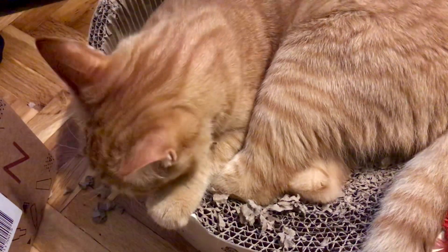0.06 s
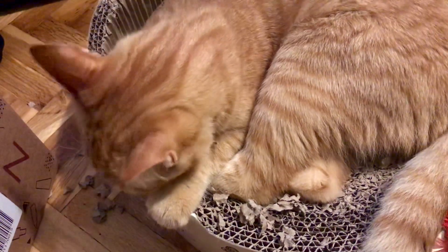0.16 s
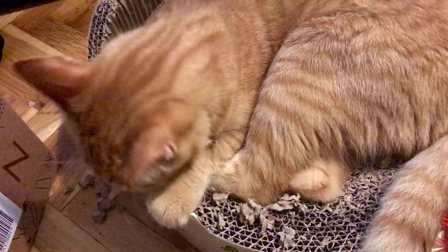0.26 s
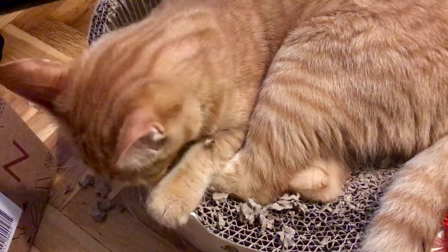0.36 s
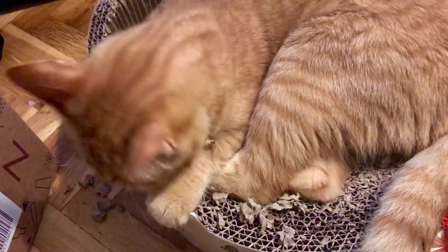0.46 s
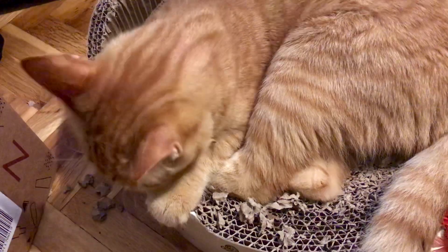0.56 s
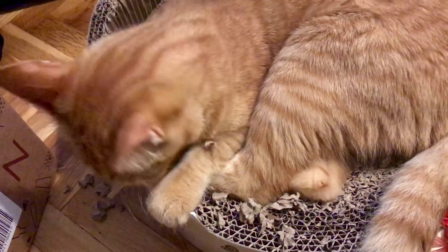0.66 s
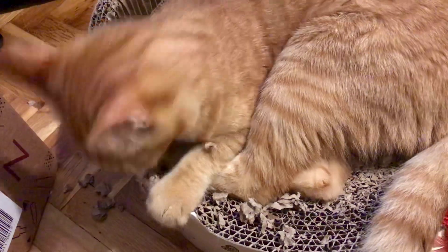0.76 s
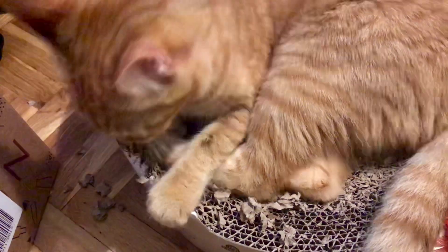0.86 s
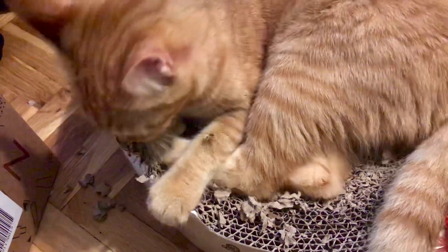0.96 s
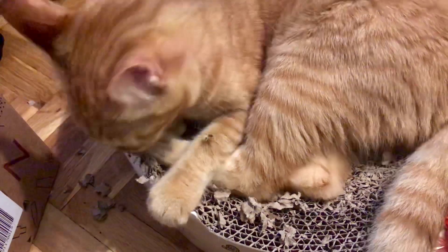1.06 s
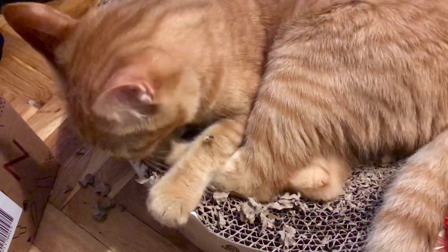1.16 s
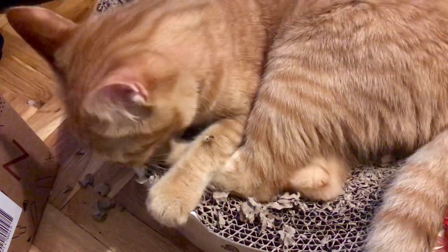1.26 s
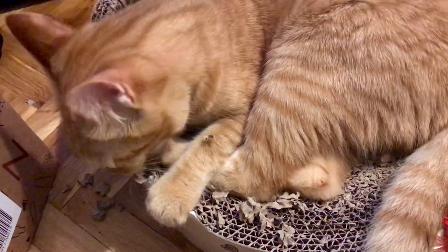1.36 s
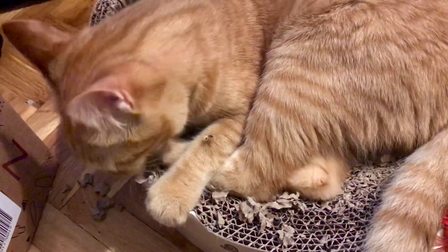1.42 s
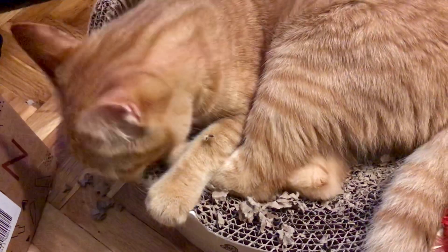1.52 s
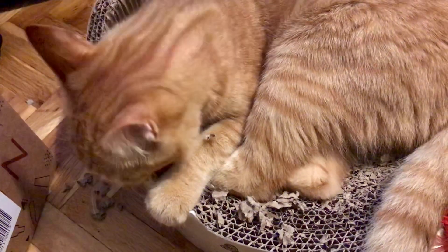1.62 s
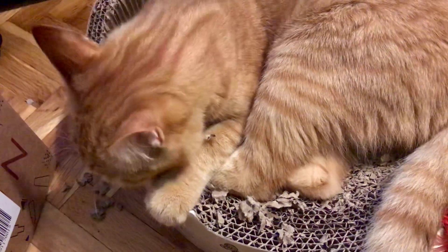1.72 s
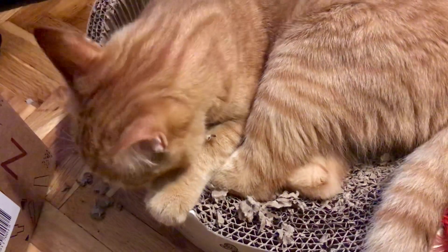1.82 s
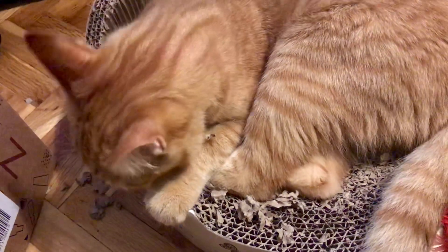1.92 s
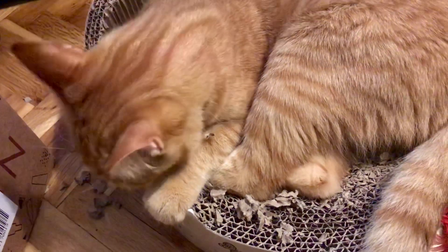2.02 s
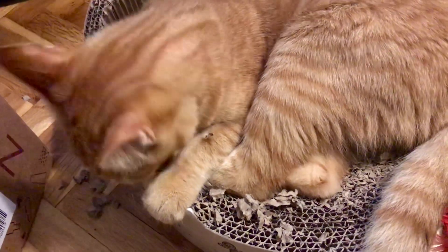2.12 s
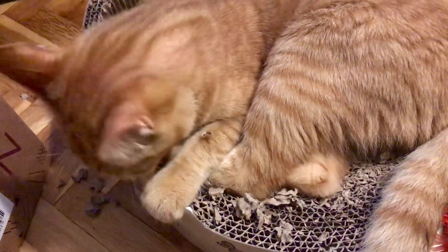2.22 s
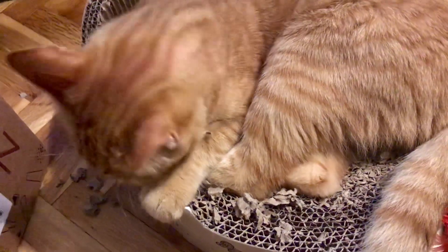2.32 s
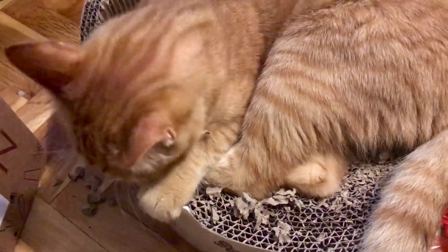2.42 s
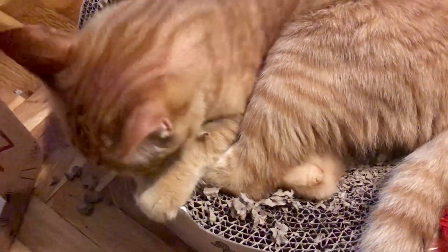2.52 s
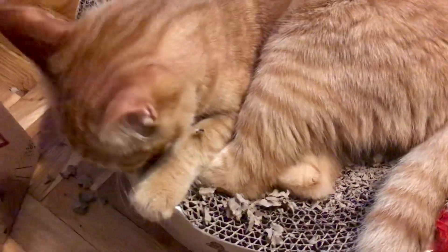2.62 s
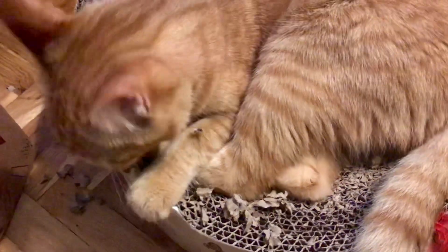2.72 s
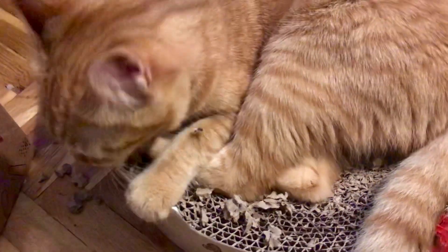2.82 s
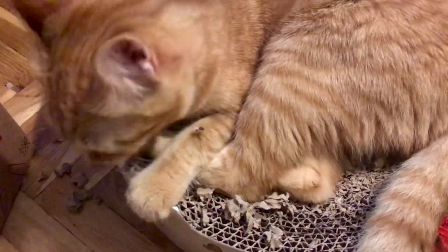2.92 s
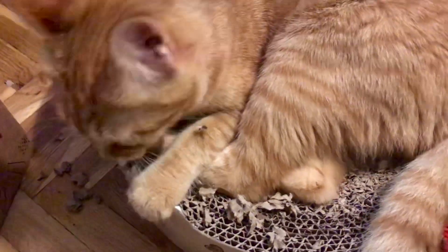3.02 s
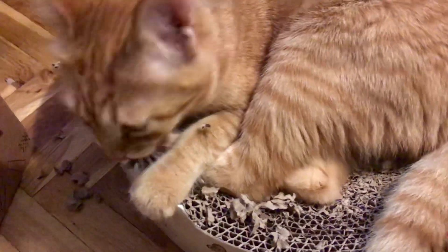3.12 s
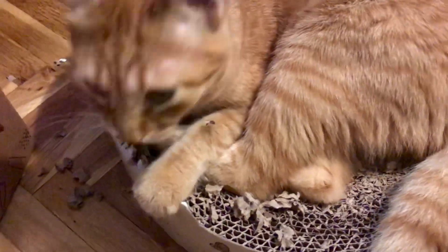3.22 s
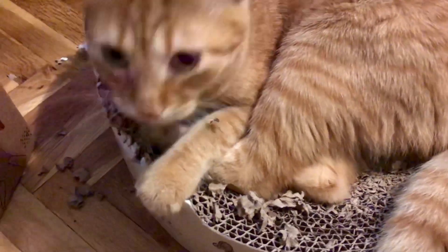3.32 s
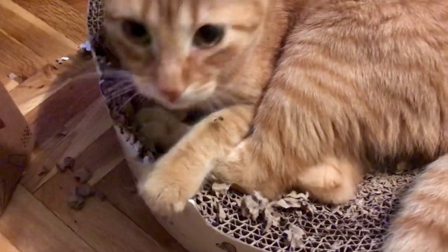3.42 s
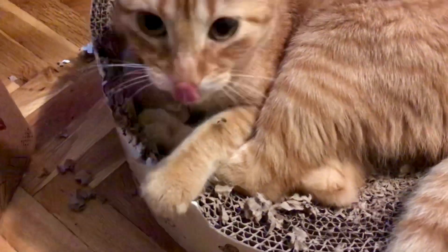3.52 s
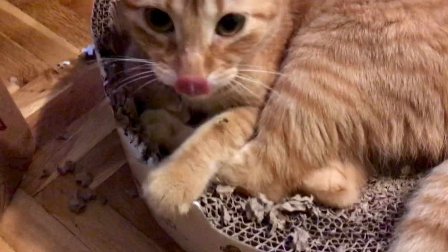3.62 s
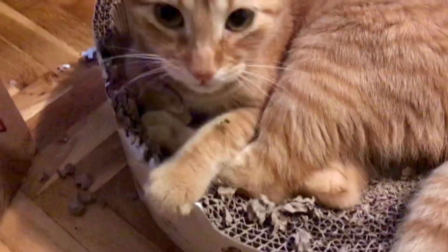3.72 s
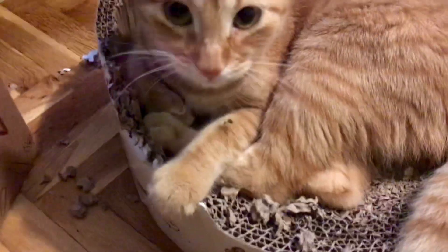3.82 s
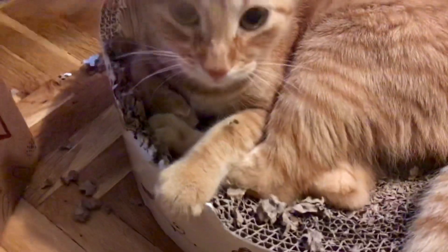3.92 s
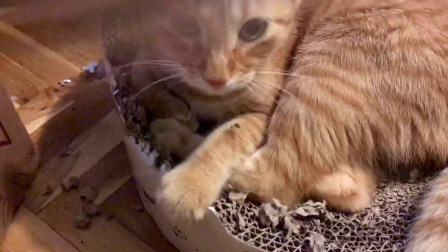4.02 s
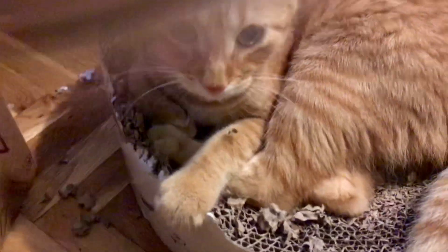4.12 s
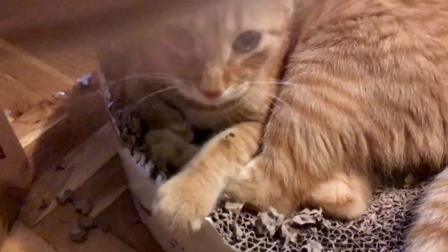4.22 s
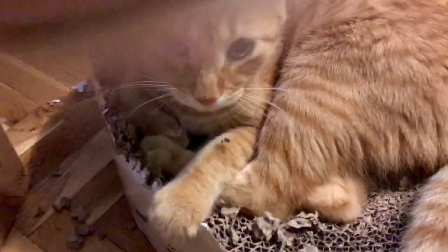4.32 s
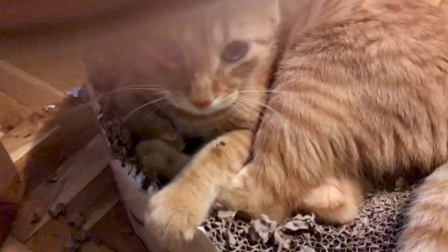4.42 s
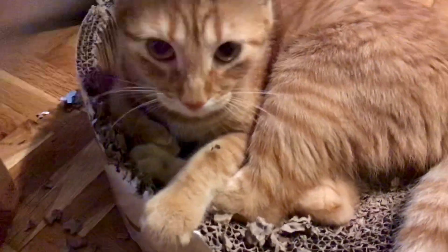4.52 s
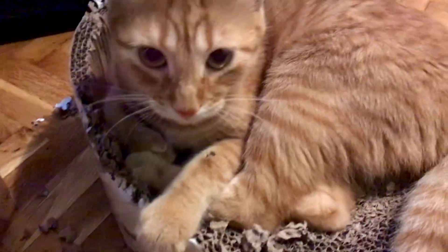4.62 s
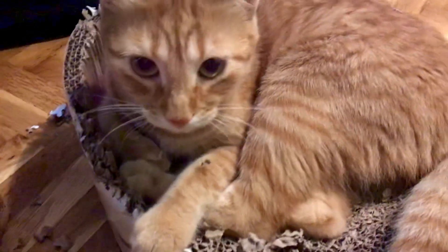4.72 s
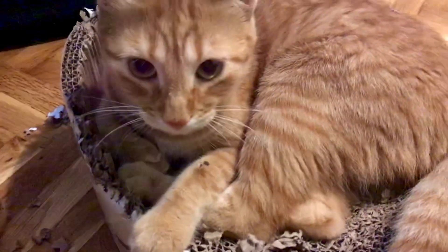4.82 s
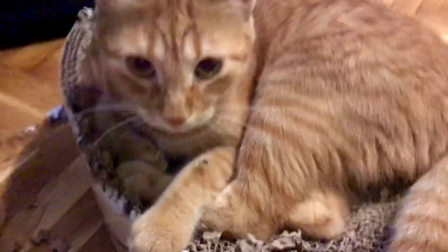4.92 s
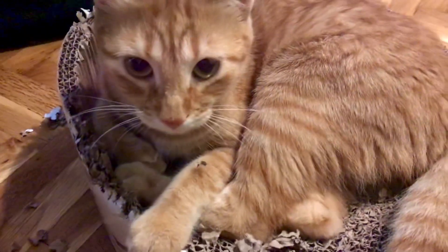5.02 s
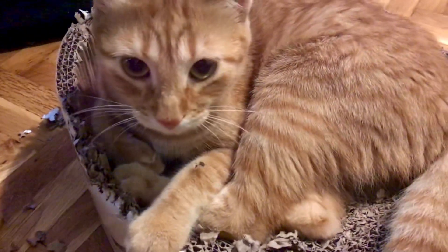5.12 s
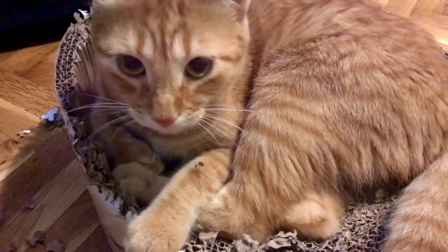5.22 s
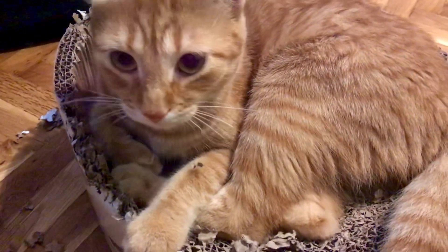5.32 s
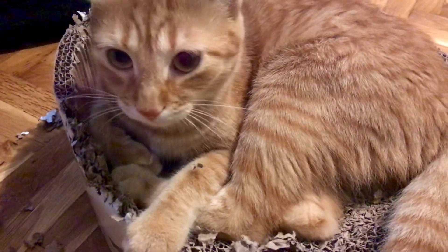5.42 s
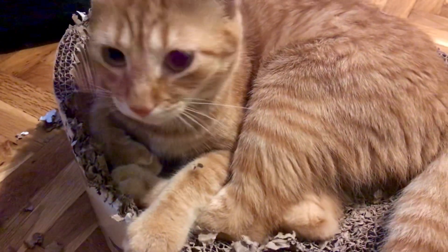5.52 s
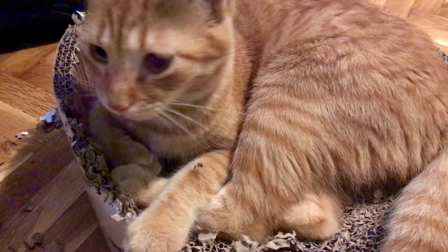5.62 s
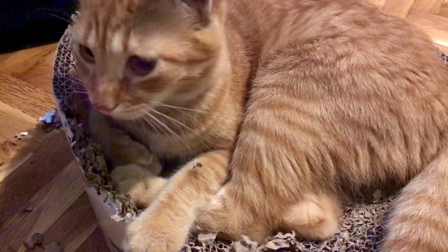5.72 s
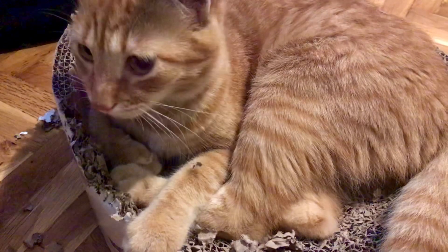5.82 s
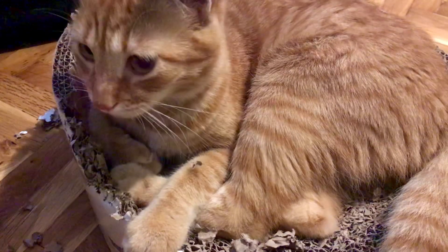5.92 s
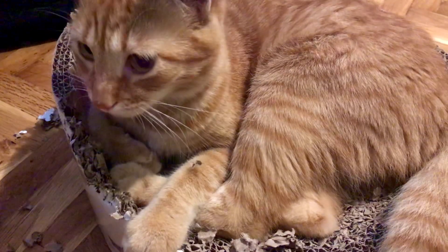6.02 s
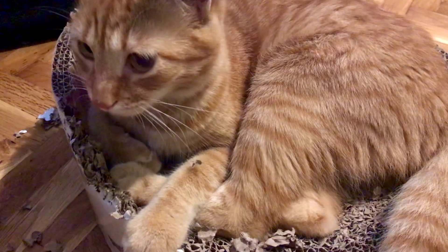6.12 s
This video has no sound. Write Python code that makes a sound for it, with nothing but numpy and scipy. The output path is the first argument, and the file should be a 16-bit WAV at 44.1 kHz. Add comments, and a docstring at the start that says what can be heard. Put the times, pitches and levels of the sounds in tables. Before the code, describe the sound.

Close up in a quiet room, a cat rips and crunches corrugated cardboard in short bursts, then pauses; a few light knocks and a soft bump follow.

```python
"""Over a low hum and a faint electronic whine, fur and teeth rub on cardboard and a rip follows at once.
A cat bites and tears a corrugated cardboard bed, close by in a quiet room: each pull breaks a run of
paper fibres, stiff flutes snap, and the hollow board resonates under both. Soft bumps and, later,
light taps are heard. Random impulses excite the modes of paper, board, floor and a small object;
sines make the hum and whine, filtered noise the room air."""
import sys
import numpy as np
from scipy import signal
from scipy.fft import rfft, irfft, next_fast_len
from scipy.io import wavfile
from scipy.ndimage import map_coordinates

SR = 44100
rng = np.random.default_rng(int(sys.argv[2]) if len(sys.argv) > 2 else 0)


def transcribe(signal):
    """Save signal, clipped to [-1, 1], as a 16-bit WAV file at the path in sys.argv[1]."""
    frames = np.atleast_2d(signal).T
    limited = np.clip(frames, -1, 1)
    pcm = np.round(limited * 32767).astype(np.int16)
    wavfile.write(sys.argv[1], SR, pcm)


N = 271656
T = np.arange(N) / SR
BLOW = T[:SR // 4]  # time axis of one short event, s

# Low room hum. Each row: time in seconds, fundamental in Hz, mean level in dB.
HUM_COURSE = [(0, 59.66, -63), (2.5, 61.16, -66), (4.2, 59, -69.5), (4.699, 53.95, -63.5),
              (5.398, 54.46, -66), (6.16, 51.3, -68.5)]
# Spectrum of the room air. Each row: frequency in Hz, relative gain in dB.
AIR_SPECTRUM = [(12, -40.5), (22, -34.5), (36, -15), (62, -7.5), (90, -11), (120, -12), (170, -15),
                (220, -18), (390, -24.5), (1000, -30), (4000, -37.5), (16000, -43.5)]
# Strokes of fur and teeth on the paper. Each row: start in seconds, length in seconds,
# level in dB before its flutter, scrape pitch in Hz.
RUB_STROKES = [(.01, .11, -61.5, 4170), (0.208, 0.083, -60.5, 2700), (.44, 0.086, -68, 3300),
               (0.605, 0.13, -62.5, 3000), (0.839, 0.035, -61, 2150), (0.934, 0.071, -63.5, 4730),
               (1.075, 0.18, -72, 4140), (1.332, 0.061, -68, 4200), (1.451, 0.096, -66.5, 4100),
               (1.574, 0.055, -67, 2800), (1.779, .44, -66, 3300), (2.327, 0.017, -65.5, 4100),
               (2.541, 0.17, -73, 2660), (2.76, 0.056, -69.5, 3500), (3.168, 0.41, -78, 3420),
               (3.66, 0.068, -69.5, 3450)]
# Spectrum of the rubbed grains. Each row: frequency in Hz, relative gain in dB.
FUR_SPECTRUM = [(350, -31.5), (600, 3.5), (900, -1.5), (1400, 1), (2200, -1.5), (4100, -3.5), (7600, -6),
                (10500, -9.5), (16000, -9.5)]
# Pulls that tear the paper. Each row: time of the height in seconds, rise in seconds per 20 dB,
# fall in seconds per 20 dB, rip level in dB, flap ring in Hz, board level in dB over the rip.
TEAR_PULLS = [(0.042, 0.031, 0.041, -44.5, 5960, -10), (.133, .015, 0.069, -40.5, 4200, -3),
              (.158, 0.032, 0.049, -40, 3000, 0), (.193, 0.016, 0.013, -39, 3580, 2.5),
              (0.297, 0.07, 0.036, -47.5, 3150, -10.5), (.335, 0.069, 0.075, -50, 2400, -7.5),
              (.495, 0.074, .06, -56, 3970, -6), (.799, .013, 0.02, -33.5, 6800, -4),
              (.811, 0.018, 0.021, -32.5, 3400, -2.5), (1.826, 0.025, 0.031, -49, 3100, 1.5),
              (1.881, .02, 0.015, -49.5, 5960, -2.5), (1.904, 0.0088, 0.01, -48.5, 3000, -3),
              (1.924, 0.011, 0.029, -41, 2900, -0.5), (2.04, 0.036, 0.014, -49, 4400, -6),
              (2.083, .025, 0.022, -40, 4570, -3), (2.138, 0.02, 0.1, -55, 4020, -5),
              (2.335, 0.04, 0.077, -55, 4050, -1), (2.492, 0.047, 0.048, -43, 3680, -0.5),
              (2.885, 0.016, 0.034, -53.5, 2940, -8)]
# Spectrum of breaking paper fibres. Each row: frequency in Hz, gain in dB.
FIBRE_SPECTRUM = [(150, -25), (700, -17), (1700, -4), (3200, 0.5), (4400, 1), (4950, -7), (7100, -6.5),
                  (8000, -8.5), (12000, -11.5), (16000, -16)]
# Mean modes of the stiff paper flutes. Each row: frequency in Hz, width in Hz, level in dB.
FLUTE_MODES = [(2570, 130, 2), (3000, 120, -8), (3370, 80, -22), (3960, 90, -16), (4100, 560, -22),
               (4280, 90, -17), (5330, 88, -13), (6640, 310, -4), (6930, 180, -17.5), (8600, 67, -13),
               (12000, 450, -13)]
# Modes of the hollow board. Each row: frequency in Hz, width in Hz, relative level in dB.
BOARD_MODES = [(165.3, 63, 2.5), (357.3, 42, 3), (499, 66, 0), (613, 89, -1), (740, 97, -1.5),
               (1054, 77, -1), (1424, 89, 1.5), (1647, 120, -6.5), (1935, 160, -6.5)]
# Flutes that snap. Each row: time in seconds, crack level in dB, ring in Hz,
# splinter time in seconds per 20 dB, board level in dB over the crack.
FLUTE_SNAPS = [(0.0412, -43, 6550, 0.004, -21), (0.169, -36, 4630, 0.0012, -11),
               (0.1933, -25.5, 5200, 0.00096, -19), (.28, -49.5, 5500, .0023, 0),
               (0.2966, -45.5, 4600, 0.0026, -12), (.304, -47, 5500, .002, -5.5),
               (.368, -51.5, 4950, .003, -7), (0.3758, -50.5, 4520, .002, -9),
               (.516, -51, 4540, 0.0035, -9), (0.6756, -51.5, 6640, 0.0066, -5.5),
               (.765, -53.5, 5240, 0.011, -4), (.852, -44, 5260, 0.0034, -7), (1.369, -58, 3500, .008, -9),
               (1.753, -59, 3900, 0.0043, 2.5), (1.782, -44.5, 10300, 0.0061, -3.5),
               (1.809, -56, 9500, .005, -13), (1.8282, -33, 3000, 0.0077, -4),
               (1.9214, -28, 3000, 0.019, -5.5), (1.939, -38, 3500, 0.003, -6),
               (2.0308, -50, 4220, .005, -13), (2.0829, -33.5, 4370, 0.0064, -3.5),
               (2.167, -39.5, 5600, 0.023, -16), (2.176, -42, 2260, 0.0092, -1.5),
               (2.3236, -50, 4250, .0045, -5), (2.3488, -37.5, 4100, 0.0036, -7),
               (2.3788, -49, 3930, 0.004, 1), (2.445, -55, 4200, .012, -2),
               (2.463, -49.5, 4200, 0.0065, -6), (2.809, -58, 6300, .004, -9),
               (2.823, -62, 6400, .004, -13)]
# Soft bumps through the floor. Each row: time in seconds, thud level in dB.
FLOOR_BUMPS = [(1.696, -53), (2.67, -53), (2.876, -52), (4.9384, -40.5)]
# Spectrum of a dull thud. Each row: frequency in Hz, relative gain in dB.
THUD_SPECTRUM = [(25, -18), (62, -43), (90, -1.5), (165, 2), (260, -1), (400, -9), (1000, -25), (4000, -72)]
# Light taps and knocks. Each row: time in seconds, level in dB, ring in Hz,
# rattle time in seconds per 20 dB, low thud level in dB.
LIGHT_TAPS = [(3.051, -57, 710, 0.0085, -54.5), (3.331, -66, 1090, 0.0046, -62),
              (3.449, -63, 4500, 0.0024, -77), (3.545, -60, 2180, 0.0018, -68),
              (4.3855, -37, 2450, 0.0094, -63), (4.3894, -46, 1480, 0.032, -51.5),
              (4.476, -51, 2380, 0.01, -78), (4.515, -56.5, 1440, .0047, -54),
              (4.558, -54, 5750, 0.0018, -51.5), (4.569, -62, 600, 0.0068, -57),
              (6.141, -57.5, 650, 0.025, -65)]
# Modes of the tapped object. Each row: frequency in Hz, width in Hz, level in dB.
KNOCK_MODES = [(424, 73, 5), (620, 100, 6), (910, 140, 3.5), (1280, 530, -2.5), (1580, 140, 3.5),
               (1890, 170, -3.5), (2410, 140, -2), (2820, 140, 0), (3500, 1800, -7), (4500, 350, -6.5),
               (5640, 390, -16)]
# Decay of the room. Each row: frequency in Hz, reverberation time (60 dB) in seconds.
ROOM_DECAY = [(150, 0.41), (1000, 0.32), (4000, 0.19), (14000, 0.15)]

# Whine: pitch, rms level of each harmonic before the fade, and where the fade begins
WHINE_HZ, WHINE_DB, WHINE_KNEE_HZ = 1004, -87, 5500
STROKE_RISE_S, STROKE_FALL_S = 0.063, 0.13  # each spans 20 dB
CATCH_PER_S, CATCH_DB = 170, -6  # tougher fibres that break singly during a pull
BOARD_HZ, BOARD_LAG_S = 534, 0.001455  # where the board answers most, and its delay after the fibres
FIRM_DB = -34  # the level of a firm pull or bump
# Sag, the board's lowest mode: level in a firm pull, extra dB per dB of force, delay
SAG_DB, SAG_GROWS, SAG_LAG_S = -10, 0.49, 0.00715
KICK_HZ = 600  # where the board answers a snap most
BOOM_DB, BOOM_HZ, BOOM_T60_S = 0.5, 63, 0.11  # the floor's boom; level over the thud of a firm bump
# Paper scuffed by a bump: level over the thud of a firm bump, rise and fall over 20 dB
SCUFF_DB, SCUFF_RISE_S, SCUFF_FALL_S = -5, 0.022, 0.016
SETTLE_DB, BUMP_GROWS = -5.5, 0.84  # dull part over the thud; extra boom and scuff, dB per dB of force
TOP_HZ = 16000  # band limit


def amp(db):
    """Level: convert decibels to an amplitude gain."""
    return 10 ** (np.asarray(db) / 20)


def unit(x):
    """Mean power: scale a signal to rms 1."""
    return x / np.sqrt(np.mean(x ** 2) + 1e-20)


def punch(x):
    """Impulse energy: scale a blow to the energy of 4 ms at rms 1."""
    return x * np.sqrt(.004 * SR / np.sum(x ** 2))


def along(points, hz):
    """Interpolation of (Hz, value) points on a logarithmic frequency axis."""
    f, value = np.transpose(points)
    return np.interp(np.log(hz + 1), np.log(f + 1), value)


def filtered(x, response):
    """Linear filtering: multiply the spectrum of x by a complex response of frequency."""
    m = 2 * next_fast_len(len(x) // 2 + 4096)
    hz = np.fft.rfftfreq(m, 1 / SR)
    return irfft(rfft(x, m) * response(hz), m)[:len(x)]


def coloured(x, points):
    """Minimum-phase filtering: a causal response whose gain follows (Hz, dB) points."""
    def response(hz):
        cepstrum = irfft(np.log(amp(along(points, hz))))
        half = len(cepstrum) // 2
        cepstrum[1:half] *= 2  # fold the cepstrum onto positive time
        cepstrum[half + 1:] = 0
        return np.exp(rfft(cepstrum))
    return filtered(x, response)


def resonance(f, hz, width):
    """Damped oscillator: the response of one mode, 1 at its centre."""
    return 1j * f * width / (hz * hz - f * f + 1j * f * width)


def body(x, modes):
    """Modal superposition: an object answers in its (Hz, width, dB) modes, alternating in sign."""
    def response(f):
        return sum((-1) ** k * amp(db) * resonance(f, hz, width)
                   for k, (hz, width, db) in enumerate(modes))
    return filtered(x, response)


def ringing(x, hz, width, direct):
    """Resonant emphasis: add a band of relative width around hz to the direct sound."""
    return filtered(x, lambda f: direct + resonance(f, hz, width * hz))


def delayed(x, s):
    """Pure delay: x, s seconds later."""
    return np.pad(x, (round(abs(s) * SR), 0))[:len(x)]


def swelling(t, rise, fall, hold):
    """Exponential envelope: climb 20 dB in rise seconds to t = 0, hold, drop 20 dB in fall seconds."""
    steps = np.maximum(-t / rise, (t - hold) / fall)
    return amp(-20 * np.maximum(0, steps))


def wobble(rate):
    """Random modulation: a smooth curve through normal random knots, rate a second."""
    knots = rng.standard_normal(int(N * rate / SR) + 4)
    return map_coordinates(knots, [T * rate])


def fractures(rate, spread_db, size):
    """Stochastic fracture: random tiny impulses, on average rate a second, of uneven strength."""
    strength = amp(spread_db * np.clip(rng.standard_normal(size), -2, 2))
    breaks = rng.random(size) < rate / SR
    return unit(breaks * rng.choice([-1, 1], size) * strength)


def burst(life, share):
    """Impulsive excitation: one sharp break, then splinters that fall 20 dB in life seconds."""
    splinters = fractures(9000, 7.1, size=len(BLOW)) * amp(-20 * BLOW / life)
    sharp_break = 1. * (BLOW == 0)
    return share * punch(splinters) + punch(sharp_break)


def add(track, s, x):
    """Superposition: mix x into track at s seconds."""
    part = track[round(s * SR):][:len(x)]
    part += x[:len(part)]


def background():
    """Steady sources: noise-shaped air, a frequency-modulated harmonic hum, and a whine of harmonics."""
    s, hz, db = np.transpose(HUM_COURSE)
    phase = 2 * np.pi * np.cumsum(np.interp(T, s, hz)) / SR + 0.38 * wobble(4.6)
    tone = np.sin(phase) + amp(-11.0) * np.sin(2 * phase) + amp(-13) * np.sin(3 * phase)
    hum = amp(np.interp(T, s, db) + 1.7 * wobble(1.7)) * tone
    harmonics = WHINE_HZ * np.arange(1, 14)
    whine = amp(WHINE_DB) * sum(np.sin(2 * np.pi * f * T) / np.hypot(1, f / WHINE_KNEE_HZ)
                                for f in harmonics)
    air = amp(-65.5) * unit(coloured(rng.standard_normal(N), AIR_SPECTRUM))
    return np.sqrt(2) * (hum + whine) + air  # the root of 2 turns rms levels into sine peaks


def rubbing():
    """Friction: fine dry grains under the muzzle and paws; each stroke scrapes at its own pitch."""
    out, t = np.zeros(N), T[:SR]
    for s, length, db, hz in RUB_STROKES:
        lead = min(s, .1)  # room for the rise, s
        grains = coloured(fractures(4000, 3.7, size=len(t)), FUR_SPECTRUM)
        scrape = unit(ringing(grains, hz, width=0.46, direct=0.77))
        stroke = scrape * swelling(t - lead, STROKE_RISE_S, STROKE_FALL_S, length)
        add(out, s - lead, amp(db) * stroke)
    flutter = amp(1.5 * wobble(70))
    return out * flutter


def paper(x):
    """Modal ringing after fracture: a broad crack, then the flutes' short ring, its modes varied."""
    chance = rng.standard_normal((len(FLUTE_MODES), 2))
    modes = [(hz * (1 + .025 * a), width, db + 2.7 * b)
             for (hz, width, db), (a, b) in zip(FLUTE_MODES, chance)]
    ring = np.pad(body(x, modes), (SR // 2000, 0))[:len(x)]  # half a millisecond late
    return coloured(x, FIBRE_SPECTRUM) + amp(2.0) * ring


def tears():
    """Forced vibration: breaking fibres ring the flap, the board flexes later, firm pulls make it sag."""
    out = np.zeros(N)
    for s, rise, fall, rip_db, flap_hz, board_db in TEAR_PULLS:
        lead = min(s, .1)  # room for the rise, s
        swell = swelling(BLOW - lead, rise, fall, hold=0)
        clumps = amp(3.9 * wobble(220.5)[:len(BLOW)])  # the tear catches and slips
        run = fractures(2600, 3.1, size=len(BLOW)) * clumps
        catches = amp(CATCH_DB) * fractures(CATCH_PER_S, 2.8, size=len(BLOW))
        fibres = (run + catches) * swell
        crisp = ringing(paper(fibres), flap_hz, width=0.67, direct=1.0)
        flexing = ringing(body(fibres, BOARD_MODES), BOARD_HZ, width=0.78, direct=0.6)
        hollow = delayed(flexing, BOARD_LAG_S)
        lowest = BOARD_MODES[:1]
        sag = delayed(body(body(fibres, lowest), lowest), SAG_LAG_S)
        sag_db = SAG_DB + SAG_GROWS * (rip_db - FIRM_DB)
        pull = unit(crisp) + amp(board_db) * unit(hollow) + amp(sag_db) * unit(sag)
        # the rms of the swell keeps rip_db the level at the height
        add(out, s - lead, amp(rip_db) * np.sqrt(np.mean(swell ** 2)) * pull)
    return out


def snaps():
    """Impulse response: a breaking flute rings briefly by itself and kicks the board's modes."""
    out = np.zeros(N)
    for s, db, hz, life, board_db in FLUTE_SNAPS:
        kick = burst(life, share=0.89)
        crack = ringing(paper(kick), hz, width=0.56, direct=0.4)
        board_kick = kick + burst(0.026, share=1.0)
        hollow = ringing(body(board_kick, BOARD_MODES), KICK_HZ, width=1.0, direct=0.63)
        add(out, s, amp(db) * (punch(crack) + amp(board_db) * punch(hollow)))
    return out


def bumps():
    """Damped oscillation: a soft weight brushes the paper, lands dully, and the floor booms briefly."""
    out = np.zeros(N)
    boom_envelope = amp(-60 * BLOW / BOOM_T60_S) * (1 - np.exp(-BLOW / .02))
    boom = np.sin(2 * np.pi * BOOM_HZ * BLOW) * boom_envelope
    lead = .05  # room for the brush before the landing, s
    for s, db in FLOOR_BUMPS:
        firm_db = BUMP_GROWS * (db - FIRM_DB)
        thud = punch(coloured(burst(0.004, share=0.52), THUD_SPECTRUM))
        add(out, s, amp(db) * (thud + amp(BOOM_DB + firm_db) * punch(boom)))
        swell = swelling(BLOW - lead, SCUFF_RISE_S, SCUFF_FALL_S, hold=0)
        brush = fractures(3000, 12, size=len(BLOW)) * swell
        scuff = amp(SCUFF_DB + firm_db) * punch(coloured(brush, FUR_SPECTRUM))
        settle = amp(SETTLE_DB) * punch(coloured(brush, THUD_SPECTRUM))
        add(out, s - lead, amp(db) * (scuff + settle))
    return out


def taps():
    """Hard contact: a short rattle rings a small object's modes, with a dry tick and a little thud."""
    out = np.zeros(N)
    for s, db, hz, life, thud_db in LIGHT_TAPS:
        rattle = burst(life, share=1.3)
        tick = filtered(rattle, lambda f: resonance(f, 2600, 5100))
        knock = ringing(body(rattle, KNOCK_MODES) + amp(-30.0) * tick, hz, width=0.68, direct=0.5)
        thud = coloured(burst(0.0059, share=0.61), THUD_SPECTRUM)
        add(out, s, amp(db) * punch(knock) + amp(thud_db) * punch(thud))
    return out


def room(x, early_db, late_db):
    """Reverberation: floor and nearby box reflect at once; the walls leave a short diffuse tail."""
    hz, t, z = signal.stft(rng.standard_normal(SR // 2), SR, nperseg=256)
    decay = amp(-60 * t / along(ROOM_DECAY, hz)[:, None])
    tail = signal.istft(z * decay, SR, nperseg=256)[1]
    tail[:SR // 200] = 0  # the tail starts after 5 ms
    early = fractures(1500, 2.0, size=len(BLOW)) * amp(-60 * BLOW / 0.048) * (BLOW > .001)
    return sum(amp(db) * signal.fftconvolve(x, echo / np.linalg.norm(echo))[:N]
               for db, echo in [(early_db, early), (late_db, tail)])


def scene():
    """Superposition of the cat's work, taps, reflections, bumps and background in one channel."""
    cat, knocks = rubbing() + tears() + snaps(), taps()
    cat_room = room(cat, early_db=-13.5, late_db=-18.0)
    knock_room = room(knocks, early_db=-20.0, late_db=-11.5)
    return (cat + knocks + cat_room + knock_room + bumps() + background())[None]


def record(dry):
    """Band limiting: a very steep low-pass at TOP_HZ."""
    def low_pass(hz):
        return 1 / np.sqrt(1 + (hz / TOP_HZ) ** 160)
    return np.array([filtered(x, low_pass) for x in dry])


dry = scene()
out = record(dry)
transcribe(out)
```